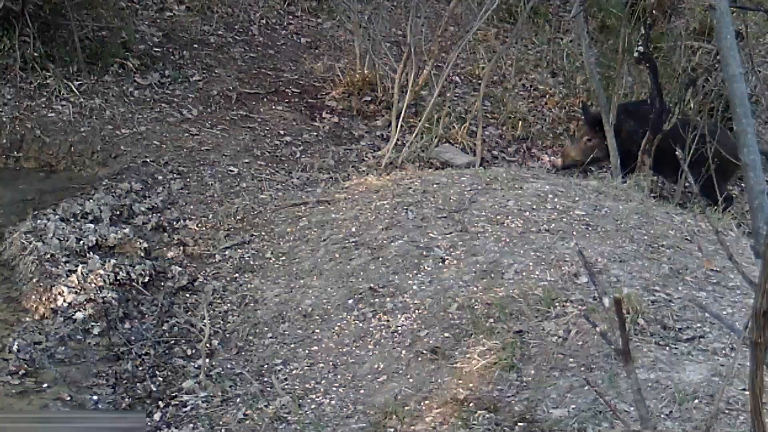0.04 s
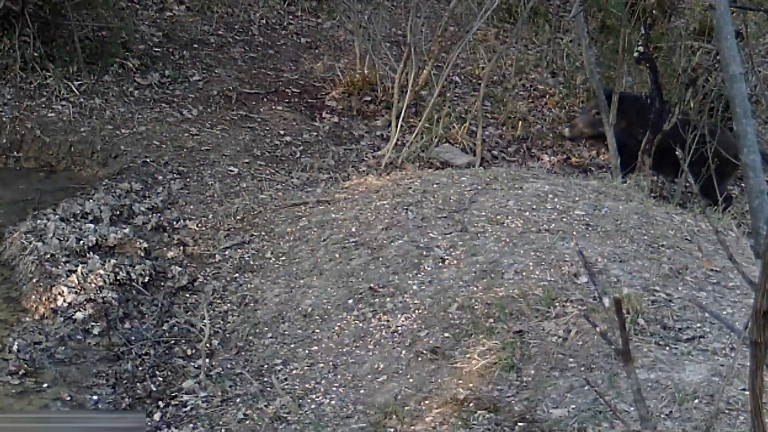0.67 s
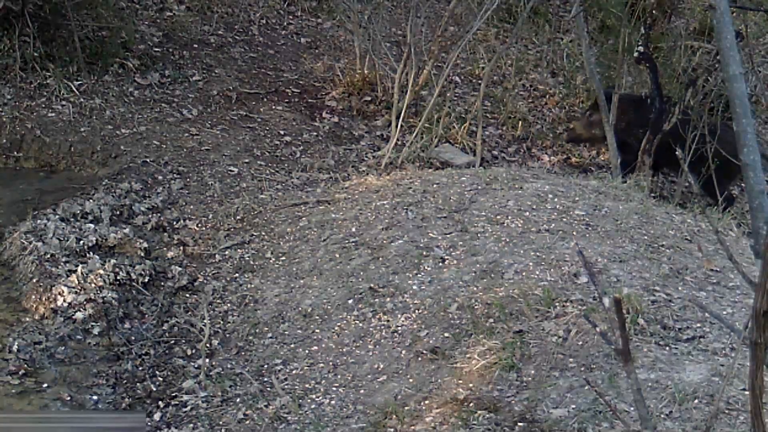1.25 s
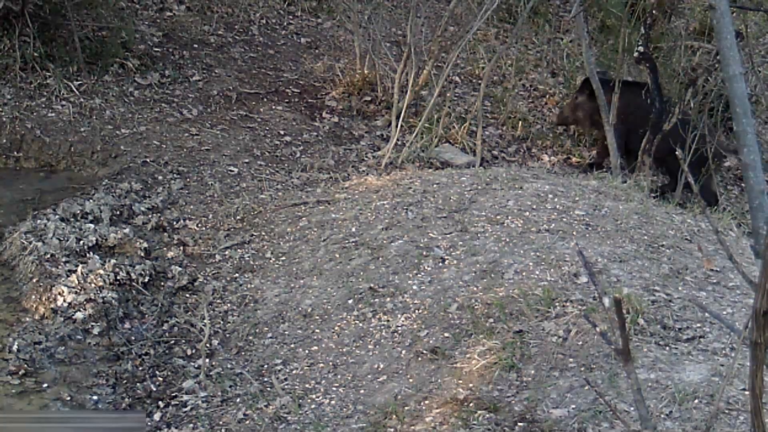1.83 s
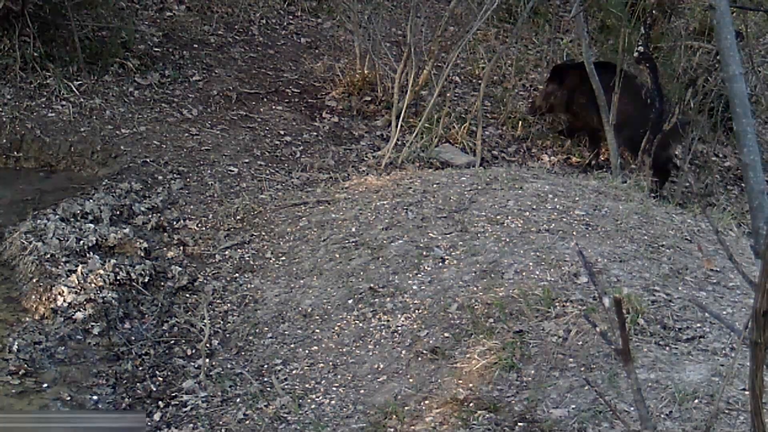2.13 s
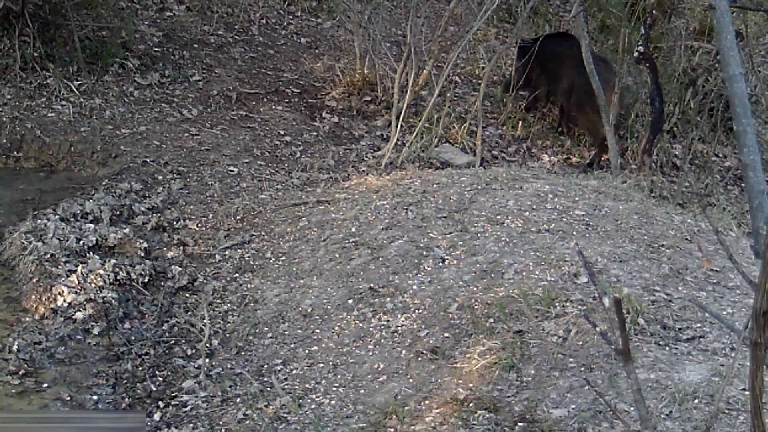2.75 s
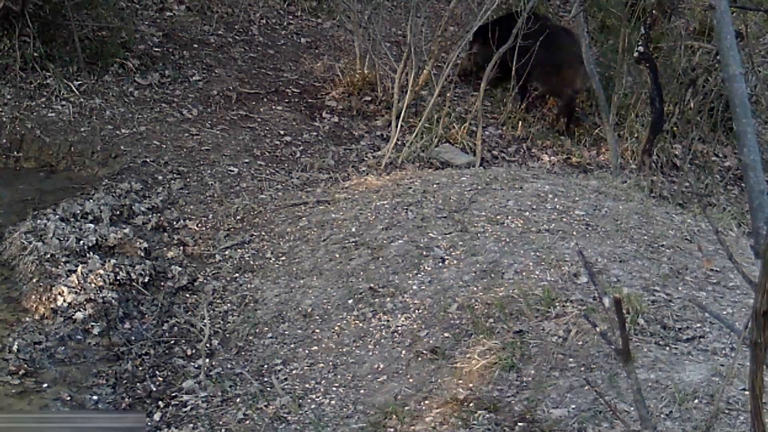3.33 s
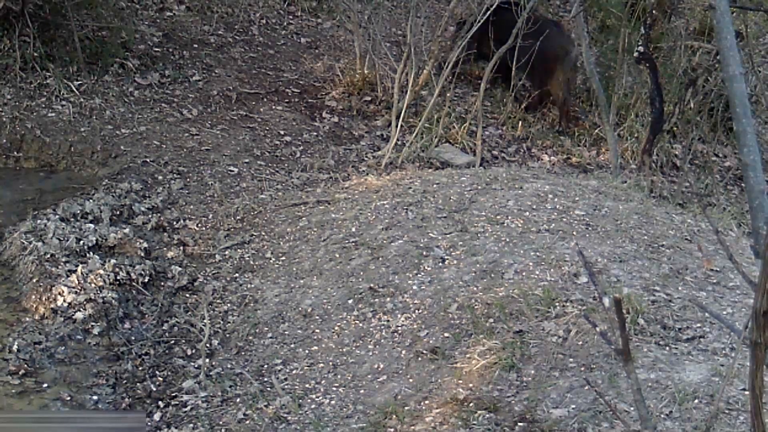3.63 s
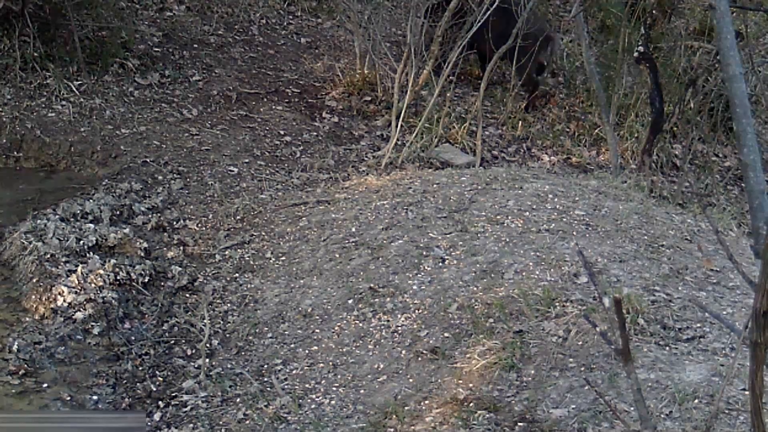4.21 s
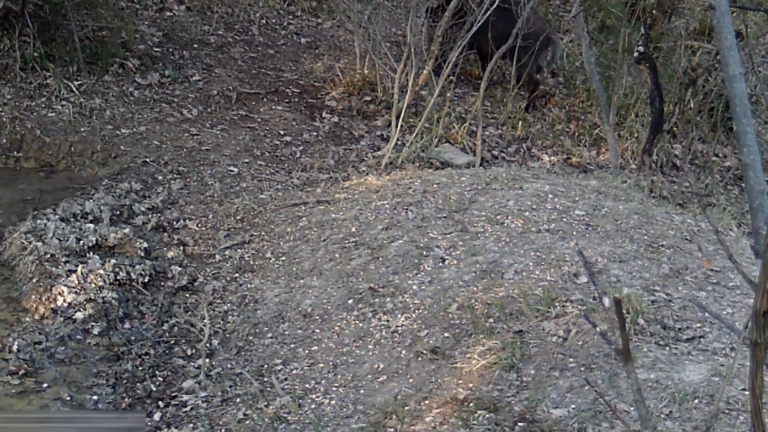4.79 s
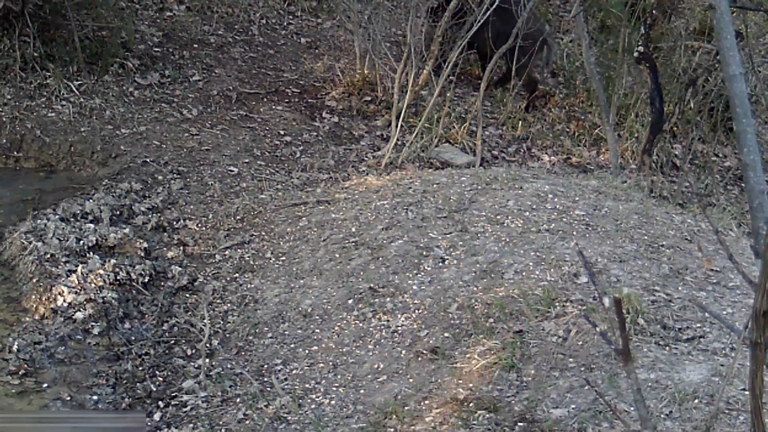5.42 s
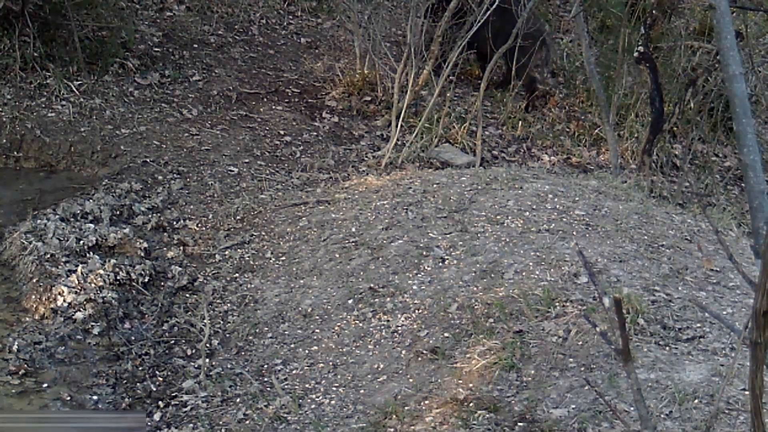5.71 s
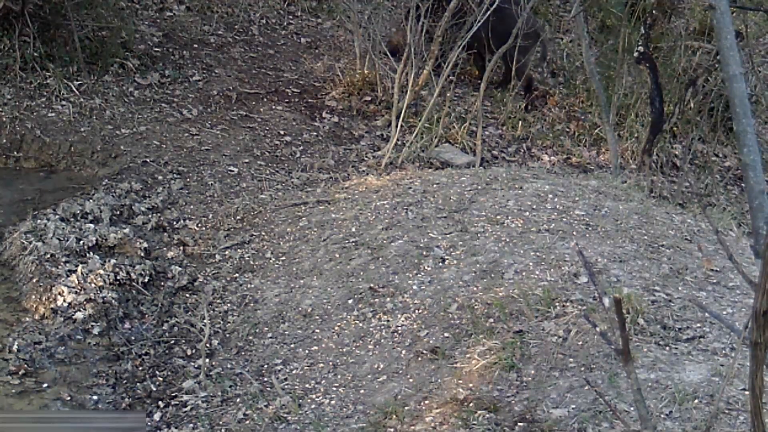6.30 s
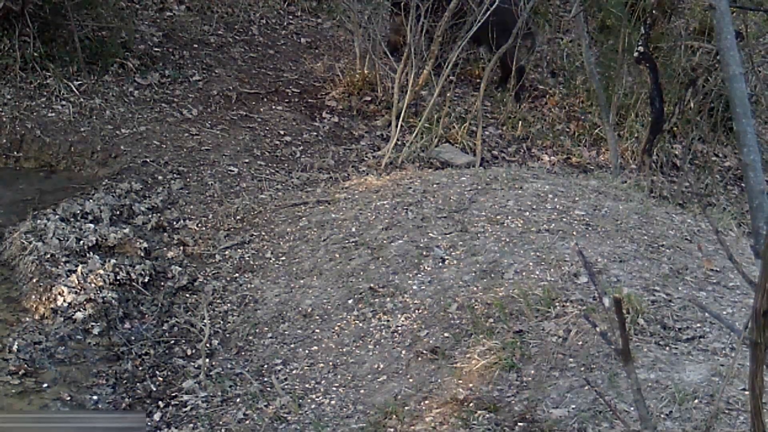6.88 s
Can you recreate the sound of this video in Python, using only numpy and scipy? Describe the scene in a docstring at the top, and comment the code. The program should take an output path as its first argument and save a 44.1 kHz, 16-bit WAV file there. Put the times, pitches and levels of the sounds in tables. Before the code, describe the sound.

A bear moves through dry leaves and snaps twigs some way off, while small birds chirp over a low rumble and thin hiss.

```python
"""A low outdoor rumble and thin hiss at the edge of a wood, cut at once by a short gap and a pop.
The microphone is a trail camera's: the gap, the pop and the hiss, pulsing at frame rate, are its own.
Small birds whistle, buzz and chip among the trees, and the far trunks send back an echo.
Some way off a bear walks away, brushing undergrowth, crushing dry leaves and snapping twigs."""
import sys
import numpy as np
from scipy import signal
from scipy.fft import rfft, irfft, next_fast_len
from scipy.io import wavfile
from scipy.ndimage import map_coordinates

SR = 44100
rng = np.random.default_rng(int(sys.argv[2]) if len(sys.argv) > 2 else 0)


def wrap_up_sound(samples):
    """Save the sound to the file named by the first command line argument, as 16-bit audio."""
    columns = np.atleast_2d(samples).T
    # keep every value between -1 and 1, then stretch to whole-number steps
    tamed = np.clip(columns, -1, 1)
    steps = np.round(tamed * 32767).astype(np.int16)
    wavfile.write(sys.argv[1], SR, steps)


N = 306495


def amp(db):
    """Decibels to gain."""
    return 10 ** (np.asarray(db) / 20)


def unit(x):
    """Scale to rms 1."""
    return x / np.sqrt(np.mean(x ** 2) + 1e-20)


def clock():
    """The time of every sample, in seconds."""
    return np.arange(N) / SR


def wobble(rate, size):
    """A smooth random curve, rate knots a second."""
    knots = rng.standard_normal(int(size * rate / SR) + 4)
    return map_coordinates(knots, [np.arange(size) * rate / SR])


def filtered(x, response):
    """Filter x by a gain that is a function of frequency."""
    size = next_fast_len(len(x) + 8192)
    return irfft(rfft(x, size) * response(np.fft.rfftfreq(size, 1 / SR)), size)[:len(x)]


def spectrum_gain(hz, points):
    """Gain along a curve through (frequency_hz, level_db) points."""
    points_hz, points_db = np.transpose(points)
    return amp(np.interp(np.log(hz + 1), np.log(points_hz), points_db))


def bump(hz, centre_hz, width_octaves):
    """A bell-shaped band on a log-frequency axis."""
    return np.exp(-.5 * (np.log2((hz + 1) / centre_hz) / width_octaves) ** 2)


def noise(points, size):
    """Noise of rms 1 with a spectrum of (frequency_hz, level_db) points."""
    return unit(filtered(rng.standard_normal(size), lambda hz: spectrum_gain(hz, points)))


def add(track, start_s, x):
    """Mix x into the track at start_s."""
    start = max(round(start_s * SR), 0)
    track[start:start + len(x)] += x[:max(N - start, 0)]


def settling():
    """Falls from 1 to 0 as air and hiss come up to their full level."""
    # the rise: start_s, end_s
    settle_s = [0.91, 2.1]
    return np.interp(clock(), settle_s, [1, 0])


def rumble():
    """The low outdoor rumble, swelling slowly."""
    # its swells: time_s, level_db
    swells = [(.3, -50), (1.2, -50.5), (2, -48.5), (2.7, -52), (3.4, -49), (4.05, -48.5), (4.5, -53.5),
              (4.9, -46), (5.25, -51.5), (5.75, -51.5), (6.15, -48), (6.9, -52)]
    # its spectrum: frequency_hz, density_db
    spectrum = [(8, -1.5), (20, -5), (32, -2), (42, -6), (57, 2), (69, -5.5), (78, -2), (88, -14),
                (122, -18), (170, -26.5), (400, -57.5), (1000, -120)]
    level_db = np.interp(clock(), *np.transpose(swells))
    return amp(level_db + 0.82 * wobble(5.5, N)) * noise(spectrum, N)


def air(level_db=-62.5, early_db=-0.7):
    """The soft, broad wash of open air around the microphone."""
    # its spectrum: frequency_hz, density_db
    spectrum = [(40, -34), (120, 4.5), (190, 1), (300, -1), (500, -6), (1000, -10.5), (1700, -12),
                (2700, -11.5), (4000, -15), (7000, -18), (12000, -20.5), (16000, -18.5)]
    return amp(level_db + early_db * settling() + 0.78 * wobble(7, N)) * noise(spectrum, N)


def camera_hiss(level_db=-66.0, early_db=-2.5, frame_hz=30.134, dip_share=0.19, dip_depth=0.92):
    """The camera's own hiss, which almost stops once in every frame."""
    # its spectrum: frequency_hz, density_db
    spectrum = [(100, -11), (600, -1.5), (1500, 0.5), (3000, 4.5), (6500, 3.5), (9000, 2.5), (14000, 1),
                (16000, -21)]
    frames_from_dip = (clock() * frame_hz - .295 + .5) % 1 - .5
    gate = 1 - dip_depth * np.exp(-(2 * frames_from_dip / dip_share) ** 4)
    return amp(level_db + early_db * settling() + 0.84 * wobble(15, N)) * gate * noise(spectrum, N)


def crackle(size, rate, spread_db):
    """Tiny fractures at random moments, their sizes spread over a range of dB."""
    hits = rng.random(size) < rate / SR
    signs = np.sign(rng.standard_normal(size))
    return unit(hits * signs * amp(-spread_db * rng.random(size)))


def litter(level_db=-73, patchy_db=4.0):
    """Leaves and stems tick faintly throughout, most as the bear gets moving."""
    band = signal.butter(2, [2500, 9000], 'band', fs=SR, output='sos')
    ticks = signal.sosfilt(band, crackle(N, rate=400, spread_db=19))
    activity = np.interp(clock(), [1.1, 2, 4.3, 6.9], [0.67, 0.95, 0.6, 0.53])
    return amp(level_db + patchy_db * wobble(16, N)) * activity * unit(ticks)


def pop(start_s, step_db=-32, settle_s=0.072, shudder_db=-42, shudder_s=0.15):
    """The camera's signal jumps and settles back, with a short low shudder."""
    # the shudder's spectrum: frequency_hz, density_db
    spectrum = [(8, 4), (30, 0), (60, 1), (90, -10), (130, -12), (200, -19), (400, -27.5), (1000, -36.5),
                (4000, -38), (16000, -65)]
    out, t = np.zeros(N), np.arange(SR // 3) / SR
    envelope = (1 - np.exp(-t / 0.0088)) * np.exp(-(t / shudder_s) ** 2)
    shudder = amp(shudder_db) * envelope * noise(spectrum, len(t))
    step = -amp(step_db) * np.exp(-t / settle_s)
    add(out, start_s, step + shudder)
    return out


def glide(start_hz, end_hz, early=0.54):
    """Start, middle and end pitch of a note; early is the share of the way covered by mid-note."""
    return [start_hz, start_hz + early * (end_hz - start_hz), end_hz]


def whistle(length_s, pitches, trill_depth_hz, trill_rate_hz=75, flutter_db=0.5):
    """One gliding bird note; a quick uneven trill of the pitch makes it buzzy."""
    size = int(length_s * SR)
    progress = np.linspace(0, 1, size)
    contour_hz = np.polyval(np.polyfit([0, .5, 1], pitches, 2), progress)
    trill = np.sin(2 * np.pi * np.cumsum(trill_rate_hz * (1 + .3 * wobble(60, size))) / SR)
    waver_hz = (13 + 0.522 * trill_depth_hz) * wobble(200, size)  # even a pure note is unsteady
    tone = np.sin(2 * np.pi * np.cumsum(contour_hz + trill_depth_hz * trill + waver_hz) / SR)
    envelope = np.sqrt(np.abs(np.sin(np.pi * progress)))
    return unit(tone * envelope * amp(flutter_db * wobble(75, size)))


def near_birds(scoop_start_s=.368, scoop_length_s=.25, scoop_db=-66.5, scoop_trill_hz=480):
    """Birds in the nearer trees: one scooping call, plain whistles, buzzes and short chips."""
    # a call that dips, then rises into a buzz: start_hz, middle_hz, end_hz
    scoop_pitches = [4150, 4230, 5400]
    # plain whistles: start_s, length_s, start_hz, end_hz, level_db
    whistles = [(.1, 0.035, 3770, 3560, -58), (0.103, 0.093, 2610, 2440, -67),
                (.16, .03, 3760, 3750, -66.5), (0.273, .06, 4600, 4950, -74),
                (0.314, 0.048, 4350, 4150, -72), (0.657, 0.04, 2470, 2570, -66.5),
                (.7, .04, 2680, 2800, -71.5), (.885, .045, 2230, 2180, -71.5),
                (0.98, 0.025, 1720, 1700, -72.5), (1.016, .025, 1720, 1690, -69),
                (1.075, .08, 3720, 3560, -72), (3.08, .19, 2940, 2890, -70.5), (3.13, .09, 2420, 2300, -75),
                (3.218, 0.07, 2300, 1990, -69), (3.768, .045, 4620, 4590, -69),
                (3.842, 0.055, 2690, 2770, -66.5), (4.64, 0.12, 2230, 2160, -73),
                (4.755, .03, 2900, 2870, -68), (4.793, .035, 2680, 2760, -67),
                (5.002, .045, 5400, 5340, -71), (5.24, .1, 2095, 1920, -74),
                (5.292, 0.054, 3330, 3080, -68), (5.481, .05, 3770, 3680, -67),
                (5.545, .11, 3630, 3570, -66.5), (5.8, .045, 4750, 4960, -69.5),
                (6.05, .05, 3380, 3560, -72), (6.865, .07, 6180, 6330, -72.5)]
    # buzzy notes: start_s, length_s, start_hz, end_hz, trill_depth_hz, level_db
    buzzes = [(.115, 0.12, 3600, 2890, 398, -72), (1.325, 0.055, 3900, 3450, 200, -68),
              (2.312, 0.061, 2920, 2780, 80, -64), (2.345, .11, 2700, 2500, 110, -67),
              (2.946, .085, 4130, 4040, 140, -70), (2.995, 0.044, 3280, 3120, 90, -69.5),
              (3.257, .03, 4800, 4690, 150, -63), (4.57, 0.07, 2800, 2720, 140, -69.5),
              (4.82, 0.093, 3000, 3110, 380, -67.5), (5.036, 0.022, 4800, 4420, 130, -65),
              (5.492, 0.036, 4980, 4780, 140, -69)]
    # falling chips: start_s, pitch_hz, fall_share, level_db
    chips = [(.843, 2990, .03, -67), (.858, 2750, .05, -74), (0.879, 2960, 0.034, -72),
             (1.125, 6420, 0.022, -72), (1.171, 3040, 0.061, -65.5), (1.205, 2630, .04, -67),
             (1.274, 2980, 0.06, -70), (1.568, 3150, 0.25, -74), (3.942, 3300, .03, -66),
             (4.838, 3300, 0.1, -65), (5.94, 1680, .15, -69), (6.278, 4010, .01, -66),
             (6.458, 3900, .03, -68), (6.497, 3740, .03, -70)]
    out = np.zeros(N)
    widening_hz = scoop_trill_hz * np.linspace(.12, 1, int(scoop_length_s * SR))
    add(out, scoop_start_s, amp(scoop_db) * whistle(scoop_length_s, scoop_pitches, widening_hz))
    for start_s, length_s, start_hz, end_hz, db in whistles:
        add(out, start_s, amp(db) * whistle(length_s, glide(start_hz, end_hz), trill_depth_hz=6))
    for start_s, length_s, start_hz, end_hz, trill_depth_hz, db in buzzes:
        add(out, start_s, amp(db) * whistle(length_s, glide(start_hz, end_hz), trill_depth_hz))
    for start_s, pitch_hz, fall, db in chips:
        pitches = glide(pitch_hz * (1 + fall / 2), pitch_hz * (1 - fall / 2))
        add(out, start_s, amp(db) * whistle(length_s=0.0288, pitches=pitches, trill_depth_hz=61.5))
    return out


def far_birds(level_db=-78, low_hz=2200, octaves=1.4, count=70):
    """A faint scatter of chirps from deeper in the wood."""
    out = np.zeros(N)
    for when, height, slope, span, loudness in rng.random((count, 5)):
        tilt = 1 + (slope - .5) * np.array([.12, 0, -.12])
        pitches = low_hz * 2 ** (octaves * height) * tilt
        chirp = whistle(0.032 + .06 * span, pitches, trill_depth_hz=41.3)
        add(out, when * N / SR, amp(level_db + 4.8 * (loudness - 1.5)) * chirp)
    return out


def paws(swish_s=0.12, swish_hz=5870, width_octaves=0.49, stems_db=-11, stems_hz=2700):
    """Each paw crushes dry leaves in a swell of crackles over duller stems; brushing past is slower."""
    # paws landing on leaves: peak_s, level_db, centre_hz, half_width_s
    footfalls = [(1.946, -62, 5460, 0.033), (2.078, -62.5, 6260, 0.032), (2.235, -57.5, 5960, 0.016),
                 (3.079, -61, 5450, .014), (3.463, -60, 5630, .02), (3.617, -66, 5400, 0.022),
                 (3.706, -63, 5800, 0.016), (4.006, -65, 3400, 0.022), (4.048, -64, 4480, 0.021),
                 (4.071, -59, 4300, .01), (4.088, -59, 4500, .011), (4.203, -58.5, 6550, 0.015),
                 (4.237, -64, 4740, 0.016)]
    # the bear brushing through undergrowth: peak_s, level_db
    swishes = [(1.21, -68), (1.612, -74), (1.778, -73), (2.3, -69.5), (2.86, -73), (3.369, -66),
               (5.279, -71), (6.86, -69)]
    out = np.zeros(N)
    t = np.arange(SR // 2) / SR - 1 / 4
    contacts = list(footfalls) + [(peak_s, db, swish_hz, swish_s) for peak_s, db in swishes]
    stems = lambda hz: amp(stems_db) * bump(hz, stems_hz, width_octaves)
    for peak_s, db, centre_hz, half_width_s in contacts:
        colour = lambda hz: bump(hz, centre_hz, width_octaves) + stems(hz)
        leaves = filtered(crackle(len(t), rate=3800, spread_db=18), colour)
        swell = np.exp(-2 * (t / half_width_s) ** 2)
        add(out, peak_s + t[0], amp(db) * unit(leaves) * swell)
    return out


def singer(buzz_start_hz=4334, buzz_trill_hz=403):
    """One bird's song: a buzz falling from the same pitch each time, and a slur that levels off."""
    # songs: start_s, buzz_length_s, buzz_end_hz, buzz_db, slur_delay_s, slur_length_s,
    # slur_start_hz, slur_end_hz, slur_trill_depth_hz, slur_db
    songs = [(1.75, .44, 2400, -69.5, .63, .09, 2480, 2260, 42, -64.3),
             (2.75, 0.42, 3300, -68.5, 0.265, .06, 2930, 2830, 20, -66),
             (4.367, .28, 3140, -68, .255, .125, 2950, 2810, 6, -63.5)]
    out = np.zeros(N)
    for start_s, buzz_s, buzz_end_hz, buzz_db, delay_s, *slur_note in songs:
        slur_s, start_hz, end_hz, trill_depth_hz, slur_db = slur_note
        buzz = whistle(buzz_s, glide(buzz_start_hz, buzz_end_hz), buzz_trill_hz)
        slur = whistle(slur_s, glide(start_hz, end_hz, early=0.685), trill_depth_hz)
        add(out, start_s, amp(buzz_db) * buzz)
        add(out, start_s + delay_s, amp(slur_db) * slur)
    return out


def twigs(tear_db=-5, splinter_db=-22, splinter_t60=0.041, width_octaves=1.0):
    """A twig breaks with a sharp crack, tearing fibres and faint splintering; thin ones sound higher."""
    # twigs snapping: start_s, level_db, tear_length_s, centre_hz
    snaps = [(3.074, -48, .008, 5000), (3.087, -48, .006, 5200), (3.461, -37, 0.0073, 6500),
             (3.462, -51, .012, 3400), (3.668, -44, .009, 5000), (4.009, -55, .006, 3500),
             (4.073, -41.5, .022, 4300), (4.085, -42, 0.015, 4800), (4.096, -46, .01, 3200),
             (4.2098, -45, .018, 6000)]
    # the spectrum they share: frequency_hz, density_db
    spectrum = [(500, -20), (1000, -3), (2300, 0.5), (3500, 4), (5000, -6), (7200, 0.5), (9100, -20),
                (12000, -10), (16000, -23)]
    out, t = np.zeros(N), np.arange(SR // 10) / SR
    for start_s, db, tear_s, centre_hz in snaps:
        tearing = amp(tear_db - 60 * t / tear_s)
        splintering = amp(splinter_db - 60 * t / splinter_t60)
        force = (tearing + splintering) * rng.standard_normal(len(t)) / 2
        force[0] = 1  # the crack
        colour = lambda hz: spectrum_gain(hz, spectrum) * bump(hz, centre_hz, width_octaves)
        add(out, start_s, amp(db) * filtered(force, lambda hz: colour(hz) / colour(hz).mean()))
    return out


def woods(x, t60, wet_db):
    """Trunks scatter the sound into a diffuse tail that falls 60 dB in t60 seconds."""
    t = np.arange(SR) / SR
    tail = rng.standard_normal(SR) * amp(-60 * t / t60)
    wet = signal.fftconvolve(x, tail / np.linalg.norm(tail))[:N]
    return (x + amp(wet_db) * wet) / np.hypot(1, amp(wet_db))


def scene(echo_s=.145, echo_db=-10):
    """From the camera, in mono: the bear some way off, birds behind it, rumble, air and hiss."""
    bear = woods(paws() + litter(), t60=0.11, wet_db=-5) + woods(twigs(), t60=.1, wet_db=-4)
    birds = woods(singer() + near_birds(), t60=0.09, wet_db=-9.5) + far_birds()
    add(birds, echo_s, amp(echo_db) * woods(birds, t60=0.22, wet_db=3))  # the far trees answer
    birds = amp(-2) * woods(birds, t60=0.67, wet_db=-4)
    return (bear + birds + rumble() + air() + camera_hiss())[None]


def record(dry, gap_s=.0893, pop_s=.0995, top_hz=15800):
    """The camera drops out briefly, pops back in, and keeps nothing above its band limit."""
    live = (clock() < gap_s) | (clock() >= pop_s)
    return filtered(dry[0] * live + pop(pop_s), lambda hz: hz < top_hz)[None]


dry = scene()
out = record(dry)
wrap_up_sound(out)
```